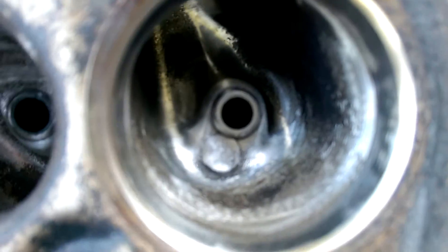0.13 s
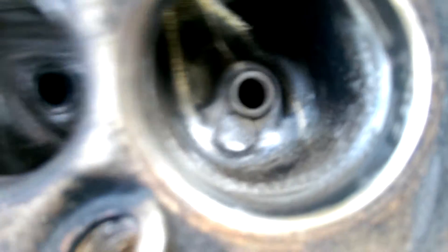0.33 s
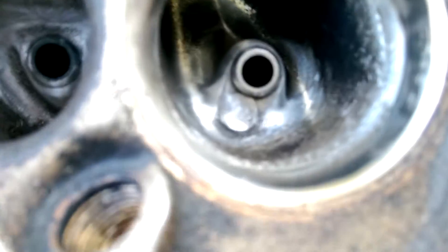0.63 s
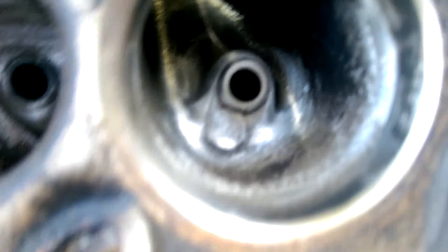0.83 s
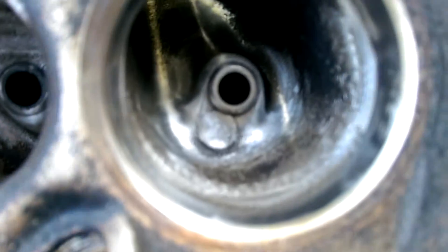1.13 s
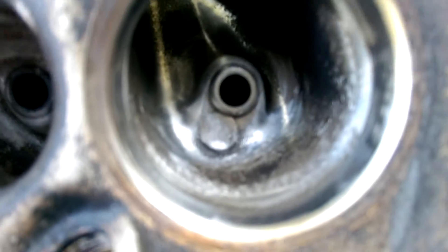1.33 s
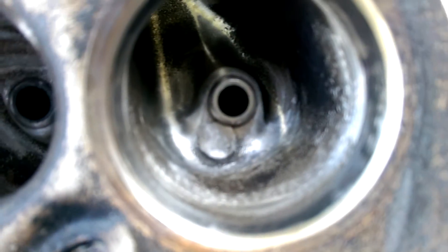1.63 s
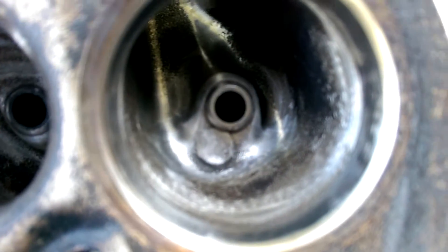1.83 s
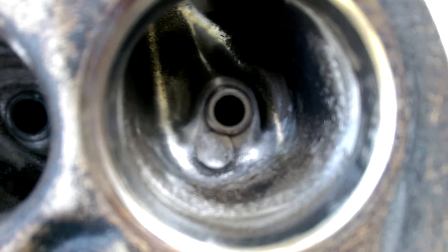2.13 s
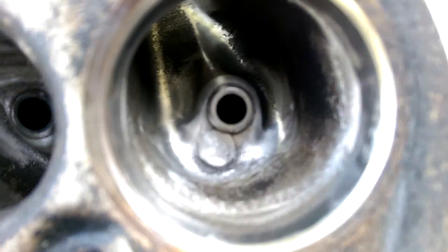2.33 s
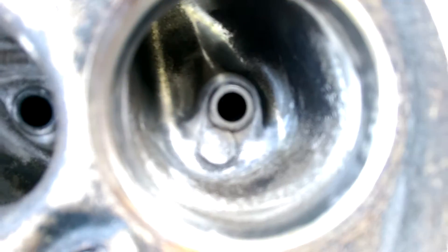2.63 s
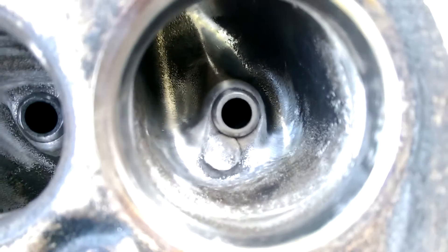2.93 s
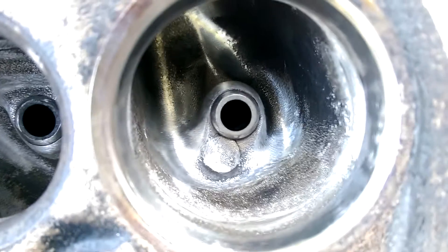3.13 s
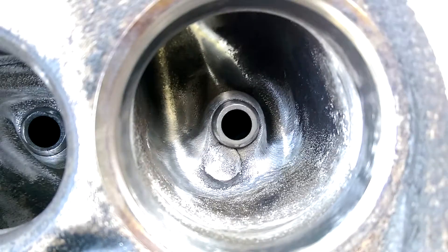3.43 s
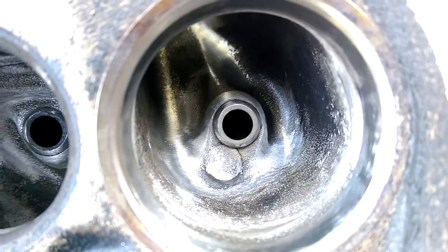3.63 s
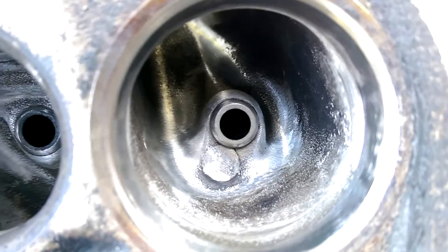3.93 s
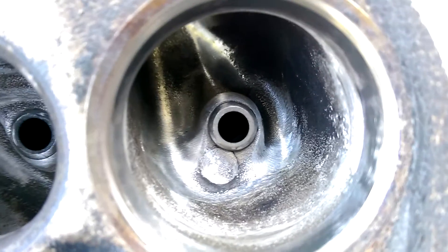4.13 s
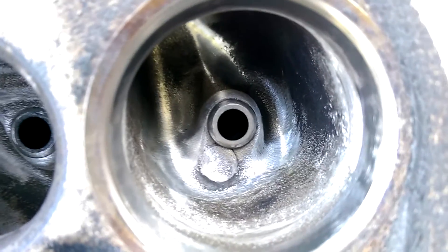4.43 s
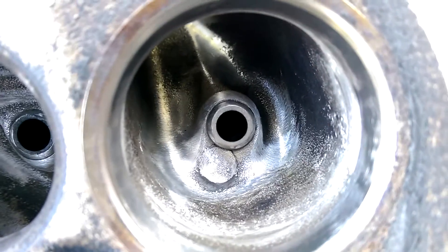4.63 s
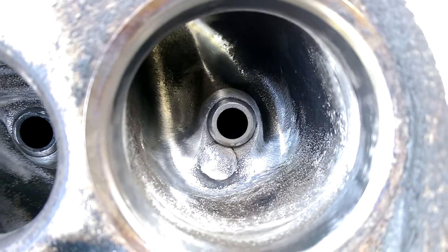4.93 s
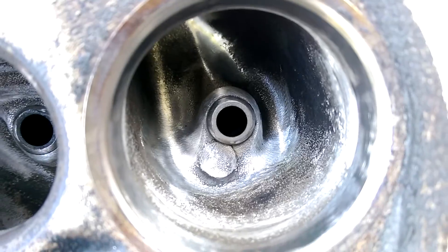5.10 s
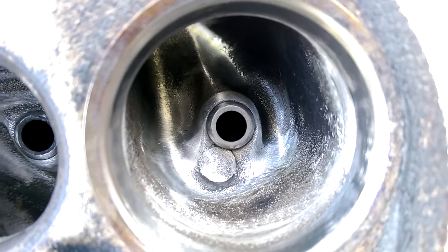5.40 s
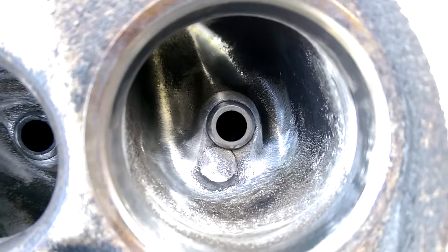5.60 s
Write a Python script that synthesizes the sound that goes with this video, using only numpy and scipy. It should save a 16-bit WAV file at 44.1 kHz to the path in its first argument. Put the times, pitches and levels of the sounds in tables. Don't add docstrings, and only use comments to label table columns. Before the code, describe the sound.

Outdoors, a small stereo camera microphone hears soft town rumble, initially stronger as passing traffic fades, beneath steady airy hiss and a faint wavering low hum. A dull, quiet knock sounds near 0.3 s toward the right, followed by soft cloth rubs at 0.5 and 1.0 s. A distant eight-cylinder engine idles almost buried, blips gently around 2 s, then pulls away from about 2.5 s. Its low, uneven, resonant drone swells by 3 s and climbs steadily in pitch to about 5.3 s, with street echoes and shifting overtones. Faint tyre hiss shows near 3.6 and 4.2 s. A sparrow gives short arching, falling chirps at 2.65, 4.7 (clearest) and, faintly, 5.6 s. A slight rub comes at 4.5 s. At 5.4 s the throttle lifts: a brief kick, a tiny bright snap at right, and pitch and loudness drop quickly toward the end.

```python
import sys
import numpy as np
from scipy import signal
from scipy.io import wavfile
from scipy.ndimage import uniform_filter1d

SR = 44100
rng = np.random.default_rng(int(sys.argv[2]) if len(sys.argv) > 2 else 0)


def persist_wave(psi):
    counts = np.round(np.clip(psi, -1, 1) * 32767).astype(np.int16)
    wavfile.write(sys.argv[1], SR, np.atleast_2d(counts).T)


def makeup_ratio(level_db):
    decades = np.asarray(level_db, float) / 20
    return 10 ** decades


N = 253994

# time_s, firing_hz, effort_db
ENGINE_RUN = [(0, 52.54, -69), (1.75, 53.5, -66.5), (1.952, 58.21, -62), (2.2, 62.5, -67.5),
              (2.35, 56.08, -69), (2.48, 55.08, -62), (2.66, 59.5, -58), (2.863, 73.3, -52),
              (3.072, 78.56, -53), (3.702, 89.1, -50.5), (4.299, 98.18, -53), (4.851, 112, -52),
              (5.15, 117.6, -51.5), (5.309, 118.9, -50.5), (5.395, 116.8, -51), (5.418, 110.3, -48.5),
              (5.601, 91.1, -49.5), (5.76, 84.76, -54.5)]


def evened(x):
    return x / np.sqrt(np.mean(x ** 2) + 1e-20)


def read(points, hz):
    f, value = np.transpose(points)
    return np.interp(np.log(hz + 1), np.log(f + 1), value)


def bump(t, at_s, half_width_s):
    return np.exp(-((t - at_s) / half_width_s) ** 2)


def wander(rate_hz, count):
    t = np.arange(0, N + 128, 64) / SR
    f = np.geomspace(rate_hz / 10, rate_hz, num=12)[:, None]
    turns = rng.random((count, len(f), 1))
    waves = np.sin(2 * np.pi * (f * t + turns)) / np.sqrt(f)
    return evened(waves.sum(axis=1)), t


def tail(x, t60_s):
    t = np.arange(SR // 2) / SR
    signs = rng.choice([-1., 1.], (2, len(t)))
    present = rng.random((2, len(t))) < 2000 / SR
    taps = signs * present * makeup_ratio(-60 * t / t60_s)
    return signal.fftconvolve(x[None], taps / np.linalg.norm(taps[0]), axes=1)[:, :N]


def noise(spectrum, same, side_db, swell_db, patchy_db):
    # freq_hz, left_lead_rad
    lead = [(20, 0), (300, -0.03), (780, 0.46), (1720, 3), (2200, 2)]
    frames, hz = N // 256 + 5, np.fft.rfftfreq(1024, 1 / SR)
    a, b, c, d, patches = rng.standard_normal((frames, 513, 5)).T
    patches = uniform_filter1d(patches, size=10, axis=0)
    patches = evened(uniform_filter1d(patches, size=16, axis=1))
    s, swell = np.transpose(swell_db)
    swell = np.interp(np.arange(frames) * 256 / SR, s, swell - swell.mean())
    same = np.clip(read(same, hz), 0, 1)[:, None]
    left = a + 1j * b
    shared = same * left * np.exp(-1j * read(lead, hz))[:, None]
    right = shared + np.sqrt(1 - same ** 2) * (c + 1j * d)
    side = makeup_ratio(read(side_db, hz) / 2)[:, None]
    level = makeup_ratio(read(spectrum, hz)[:, None] + patchy_db * patches + swell)
    z = np.array([left * side, right / side]) * level
    return evened(signal.istft(z, nperseg=1024, noverlap=768)[1][:, :N])


def engine():
    cycle_db = [13, -1.5, 6.5, -2, 5.5, 15.5, -1.5, -13, -1.5, -5, -1.5, -1, -0.5, 3, -4.5, -4.5, -6, -5,
                -3, 5, 6.5, 7.5, 4.5, -8, 1, 6, -5.5, 5, 6, 2, 1, 5.5, -2, -0.5, 0.5, 8, 0, 2.5]
    # freq_hz, level_db
    pipe = [(25, -22), (45, -8.5), (60, -1.5), (75, 0), (100, 10), (108, 14.5), (116, 18.5), (126, 16.5),
            (138, 8), (165, -1), (205, 9.5), (238, 8), (250, -4), (262, -23.5), (320, -17), (333, -11),
            (362, -17.5), (540, -20.5)]
    # time_s, half_width_s, multiple, gain_db
    swells = [(3.6, 0.11, 11, 7.5), (5.63, 0.12, 11, 7.5), (3.97, 0.15, 16, 10), (4.56, .1, 16, 7),
              (3.73, 0.13, 16, 3), (2.68, 0.091, 16, 4), (4.7, 0.11, 9, 8.5), (5.1, 0.3, 14, 5),
              (2.22, 0.18, 16, 4.5), (5.15, 0.18, 24, 9.5), (3.33, 0.21, 22, 1.5), (3.15, 0.12, 16, 10.5),
              (5.15, 0.25, 15, 3.5), (5.28, 0.22, 16, 2.5), (2.4, 0.13, 13, -8), (3.63, 0.09, 31, 8),
              (4.1, 0.24, 28, 3.5), (5.5, 0.049, 16, 7), (5.7, 0.064, 19, 4), (5.72, 0.045, 19, 7),
              (3.58, 0.18, 20, 9.5), (3.44, 0.19, 21, 8), (3.14, .2, 21, 6.5), (4.15, 0.13, 17, 8),
              (4.95, .2, 14, 3.5), (2.504, 0.13, 32, 13), (1.7, .15, 31, 7), (2.95, 0.16, 16, 9.5),
              (3.85, 0.156, 22, 5.5), (3.043, 0.25, 24, 3.5), (5.7, .12, 22, -10.5), (6, .05, 24, -8),
              (2.95, 0.11, 12, -6), (3, .12, 14, -9), (4.1, .25, 20, -2), (3.62, 0.15, 19, 10),
              (3.7, .15, 18, 5), (2.9, 0.1, 23, 4.5), (3.18, 0.13, 22, 4), (3.945, .2, 21, -3),
              (4.25, .2, 11, 0), (4.4, 0.13, 11, 5.5), (5.38, .06, 5, 6), (5.6, .08, 26, 5.5),
              (3.6, .12, 19, -5), (5.1, .25, 13, 7)]
    cylinders, waver_db, jitter = 8, 1.5, .002
    drift, t = wander(rate_hz=6.0, count=len(cycle_db) + 1)
    s, *columns = np.transpose(ENGINE_RUN)
    firing_hz, effort_db = (np.interp(t, s, c) for c in columns)
    cycle_hz = firing_hz / cylinders * (1 + jitter * drift[-1])
    k = np.arange(3, 3 + len(cycle_db))[:, None]
    db = effort_db + np.array(cycle_db)[:, None] + read(pipe, k * cycle_hz)
    db = db + throttle(t) * (k == cylinders)
    for at_s, half_width_s, multiple, gain_db in swells:
        db = db + gain_db * bump(t, at_s, half_width_s) * (k == round(multiple))
    size = makeup_ratio(db + waver_db * drift[:-1] * (k != cylinders))
    fine, start = np.arange(N) / SR, rng.random(len(k))
    turns = np.cumsum(np.interp(fine, t, cycle_hz)) / SR
    out = np.zeros(N)
    for m, a, p in zip(k[:, 0], size, start):
        out += np.interp(fine, t, a) * np.sin(2 * np.pi * (m * turns + p))
    return out


def throttle(t):
    # start_s, length_s, loss_db
    lifts = [
        (2.3, .45, -3),
        (5.405, .6, -11),
    ]
    # time_s, half_width_s, gain_db
    surges = [
        (5.32, .05, 3),
        (5.455, .02, 12),
        (5.05, .3, 1.2),
    ]
    edge_s = 0.011
    db = 0
    for s, length, loss_db in lifts:
        db = db + loss_db * np.clip(np.minimum(t - s, (s + length - t) / 5) / edge_s, 0, 1)
    return db + sum(gain_db * bump(t, s, width) for s, width, gain_db in surges)


def rings():
    # freq_hz, width_hz, level_over_effort_db, hidden_s
    modes = [
        (331, 5, 2.5, 4.5),
        (556, 8, -11, 4.2),
        (116, 9, 8, 2.9),
    ]
    steady = 1.6
    t, out = np.arange(N) / SR, np.zeros(N)
    for hz, width_hz, db, hidden_s in modes:
        r = np.exp(-np.pi * width_hz / SR)
        burns = signal.lfilter([1], [1, -2 * r, r * r], rng.standard_normal((2, N)))
        envelope = steady + evened(burns[0]) + 1j * evened(burns[1])
        ring = evened((envelope * np.exp(2j * np.pi * hz * t)).real)
        out += makeup_ratio(db - 20 * np.clip((t - hidden_s) / 0.34, 0, 1)) * ring
    s, _, effort_db = np.transpose(ENGINE_RUN)
    return out * makeup_ratio(np.interp(t, s, effort_db))


def sparrow():
    # start_s, length_s, top_hz, end_hz, level_db
    chirps = [
        (2.645, .075, 4700, 2500, -48),
        (4.703, .088, 4800, 2480, -45.5),
        (5.601, .078, 4200, 2550, -51.5),
    ]
    # upper_voice_offset_hz, upper_voice_db, second_harmonic_db, third_harmonic_db
    voices = [(320, -6, -16, -15), (480, -5, -25, -25), (200, -7, -26, -30)]
    # start_share_of_top, growth_db, second_harmonic_growth_db
    shapes = [(.79, 6, -8), (.83, -3, 14), (0.87, 2, 0)]
    bends = [(1.2, 1.05, .4), (1.3, 1.42, .9), (3, 1.05, 2.5)]
    # delay_s, level_db
    ground = (.00141, -6)
    # delay_s, left_db, right_db
    echoes = [
        (0.017, -31, -39),
        (0.1, -24, -25),
    ]
    rough, rise = .016, .35
    attack_s, release_s, hush_db = .018, .009, -16
    crest_db, crest_width, join_db, leave_db = 6, .08, -22, -20
    out = np.zeros(N)
    for chirp, voice, shape, bend in zip(chirps, voices, shapes, bends):
        s, length, top_hz, end_hz, level_db = chirp
        gap_hz, high_db, second_db, third_db = voice
        onset, grow_db, deepen_db = shape
        up, down, spread = bend
        t = np.arange(0, length, 1 / SR)
        u = t / length
        left = np.clip((1 - u) / (1 - rise), 0, 1) ** down
        rising_hz = top_hz * (onset + (1 - onset) * (u / rise) ** up)
        hz = np.where(u < rise, rising_hz, end_hz + (top_hz - end_hz) * left)
        hz = uniform_filter1d(hz, size=90)
        ends = np.minimum(t / attack_s, (length - t) / release_s)
        lead_db = crest_db * bump(u, rise, crest_width)
        db = level_db + grow_db * (u - rise) + hush_db * np.clip(1 - ends, 0, 1) - lead_db / 2
        apart_hz = gap_hz * (1 + spread * np.sqrt(1 - left))
        upper_db = high_db + lead_db + join_db * np.clip(1 - u / rise, 0, 1)
        upper_db = upper_db + leave_db * np.clip(3 * u - 2, 0, 1)
        flutter = evened(uniform_filter1d(rng.standard_normal(N // 20), size=40))[:len(t)]
        pitches_hz = [hz * (1 + rough * flutter), hz + apart_hz]
        low, high = np.exp(2j * np.pi * np.cumsum(pitches_hz, axis=1) / SR)
        both = low + makeup_ratio(upper_db) * high
        bright = np.clip((hz - 3500) / 700, 0, 1)
        second = makeup_ratio(second_db + deepen_db * (u - rise) / (1 - rise)) * both ** 2
        song = both + second + makeup_ratio(third_db) * bright * both ** 3
        at = round(s * SR)
        out[at:at + len(t)] += makeup_ratio(db + 1.5) * song.imag * signal.windows.tukey(len(t), .1)
    delay_s, bounce_db = ground
    out += makeup_ratio(bounce_db) * np.roll(out, round(delay_s * SR))
    walls = np.zeros((2, N))
    for delay_s, left_db, right_db in echoes:
        walls += makeup_ratio(np.array([[left_db], [right_db]])) * np.roll(out, round(delay_s * SR))
    direct = np.array([out, np.roll(out, shift=9)])
    return direct + walls + makeup_ratio(-7) * tail(out, .16)


def ticks():
    # start_s, peak_db
    snaps = [
        (5.453, -45),
    ]
    out, t = np.zeros(N), np.arange(200) / SR
    snap = np.sin(2 * np.pi * 10500 * t) * np.exp(-t / 0.00041)
    for s, db in snaps:
        out[round(s * SR):][:200] += makeup_ratio(db) * snap
    return out * makeup_ratio(np.array([[-12.0], [4.0]]))


def tap():
    # start_s, pitch_hz, peak_db, decay_s
    knock = (.267, 650, -39, .002)
    s, hz, db, decay_s = knock
    out, t = np.zeros(N), np.arange(1000) / SR
    tones = sum(np.sin(2 * np.pi * hz * k * t) / np.sqrt(k) for k in (1, 2.1, 3.3))
    out[round(s * SR):][:1000] = tones * np.exp(-t / decay_s)
    return out * makeup_ratio(db + np.array([[-6.0], [0.0]]))


def band_noise(low_hz, high_hz):
    band = signal.butter(2, [low_hz, high_hz], "band", fs=SR, output="sos")
    return evened(signal.sosfilt(band, rng.standard_normal((2, N))))


def scuffs():
    # time_s, level_db, length_s
    rubs = [
        (.53, -63, 0.06),
        (1.005, -57.5, 0.059),
        (4.498, -63, 0.028),
    ]
    t = np.arange(N) / SR
    shape = sum(makeup_ratio(db) * bump(t, s, length / 2) for s, db, length in rubs)
    return band_noise(1800, 9000) * shape * makeup_ratio(np.array([[-4.0], [2.0]]))


def tyres():
    # time_s, half_width_s, level_db
    gaps = [
        (3.62, 0.23, -61),
        (4.2, 0.095, -61),
    ]
    t = np.arange(N) / SR
    return band_noise(2100, 3100) * sum(makeup_ratio(db) * bump(t, s, width) for s, width, db in gaps)


def hum():
    # freq_hz, level_db
    lines = [
        (161.5, -55.5),
        (242.2, -57.5),
    ]
    waver_db = 3.5
    drift, t = wander(rate_hz=5.0, count=len(lines))
    fine, out = np.arange(N) / SR, np.zeros(N)
    for (hz, db), d in zip(lines, drift):
        out += makeup_ratio(db + 4 + waver_db * np.interp(fine, t, d)) * np.sin(2 * np.pi * hz * fine)
    return out


def town():
    # freq_hz, density_db_per_hz
    rumble_db = [(15, -53.5), (28, -25), (50, 4.5), (115, -2), (180, -14), (300, -7), (400, -14.5),
                 (620, -18), (800, -15.5), (1050, -20.5), (1300, -23), (1700, -25), (2200, -42.5),
                 (3500, -120)]
    # freq_hz, likeness_0_to_1
    same = [(20, .3), (45, 0.37), (70, 0.92), (200, 1), (400, 0.83), (700, 0.49), (1300, 0.5), (2000, .1)]
    # freq_hz, density_db_per_hz
    air_db = [(760, -33), (1300, -13), (1720, -6.5), (1910, -3), (2060, -2), (2900, -4.5), (3250, -7.5),
              (4050, -9.5), (4590, -11), (7340, -14.5), (11400, -17), (13700, -19.5), (15700, -21.5)]
    # freq_hz, left_minus_right_db
    air_side_db = [(60, 0.5), (99, 0), (160, -2), (270, 0), (450, 2.5), (740, 1.5), (1220, 0.5), (2010, -9),
                   (3330, -3), (5500, -1.5), (9080, -4.5), (15000, -8.5)]
    # time_s, half_width_s, gain_db
    gusts = [
        (2.02, 0.31, 1.5),
        (4.45, 0.25, 1.5),
        (5.401, 0.086, 1),
    ]
    opening_db, settle_s = 6, 1
    drift_db, drift_hz = 1.57, 2.96
    drift, t = wander(rate_hz=drift_hz, count=1)
    swell_db = opening_db * np.exp(-t / settle_s) + drift_db * drift[0]
    swell_db = swell_db + sum(db * bump(t, s, width) for s, width, db in gusts)
    rumble_side_db = [(100, .3), (1000, -0.43)]
    rumble = noise(rumble_db, same, rumble_side_db, np.transpose([t, swell_db]), patchy_db=1.04)
    hiss = noise(air_db, [(1, 0), (2, 0)], air_side_db, [(0, 0), (1, 0)], patchy_db=.6)
    return makeup_ratio(-42) * rumble + makeup_ratio(-59 + 3) * hiss


def scene():
    far = engine() + hum() + rings()
    wet = tail(far, .4)
    direct = np.array([np.roll(far, -12) * makeup_ratio(.4), far])
    street = direct + makeup_ratio(-16) * (wet[0] + .4 * wet)
    return street + sparrow() + ticks() + tap() + scuffs() + tyres() + town()


def top_cut(x):
    return signal.sosfilt(signal.butter(12, 15940, fs=SR, output="sos"), x)


def record(dry):
    cut = signal.sosfilt(signal.butter(2, 36, "high", fs=SR, output="sos"), dry)
    edge = signal.firwin(511, 15700, window=("kaiser", 9), fs=SR)
    mix = signal.oaconvolve(cut, edge[None], "same")
    return top_cut(mix)


dry = scene()
out = record(dry)
persist_wave(out)
```